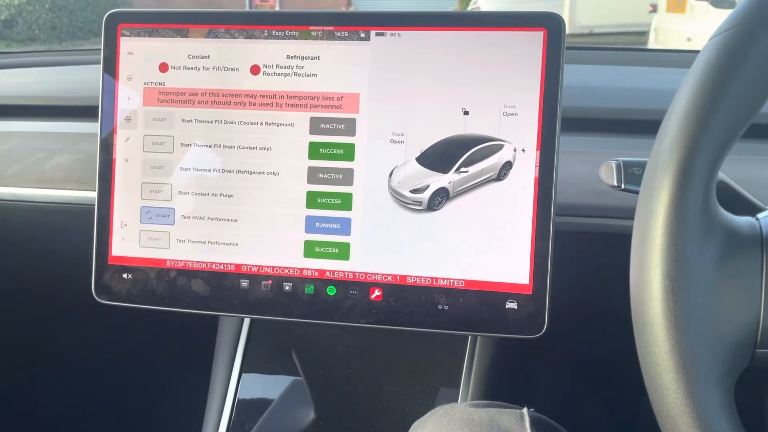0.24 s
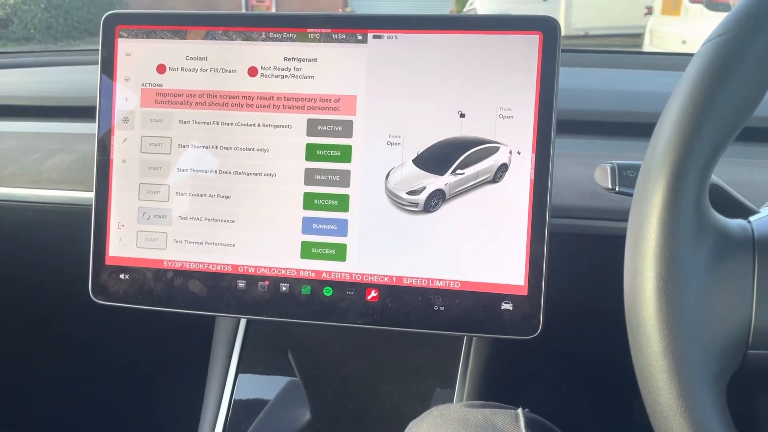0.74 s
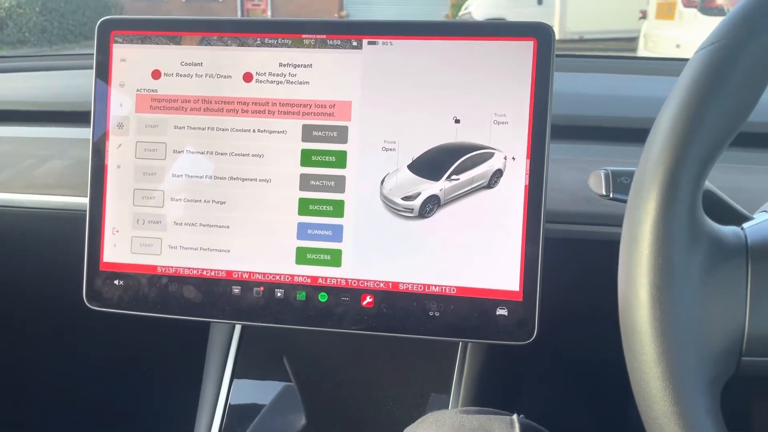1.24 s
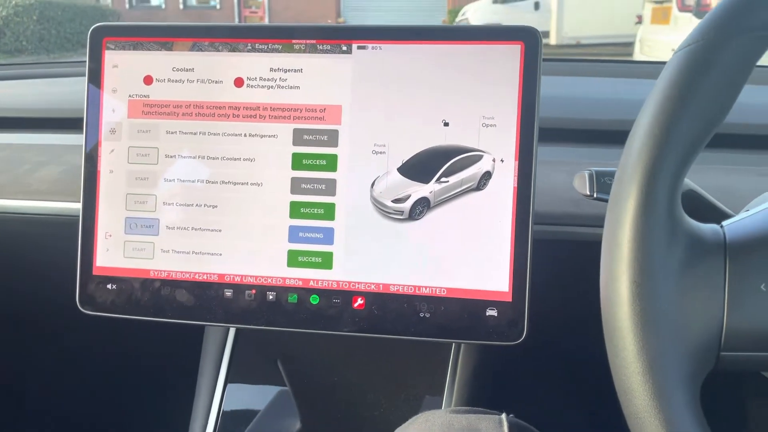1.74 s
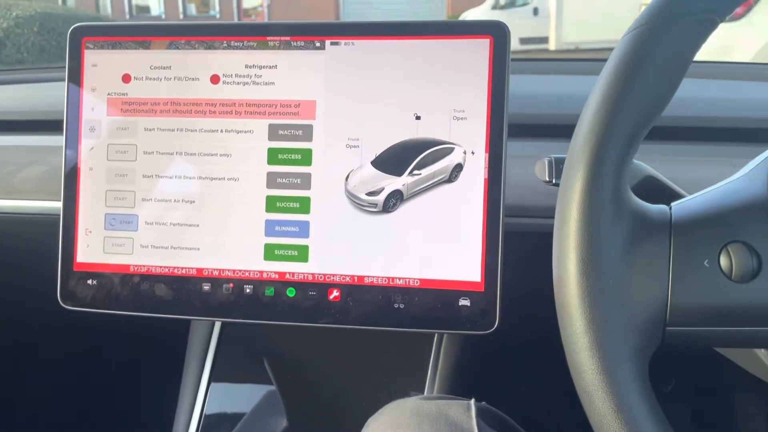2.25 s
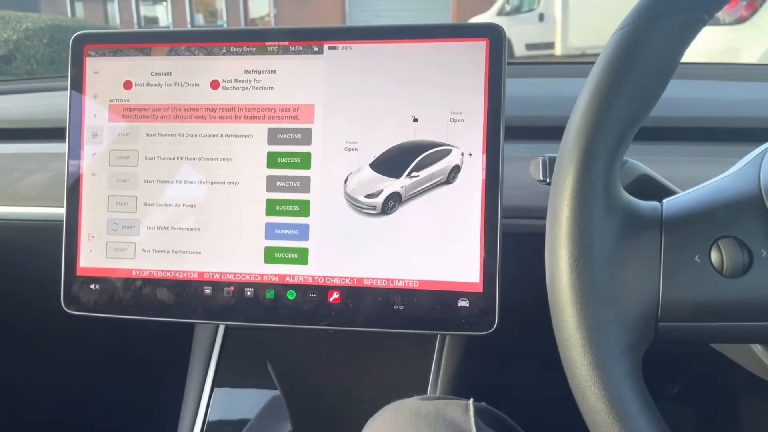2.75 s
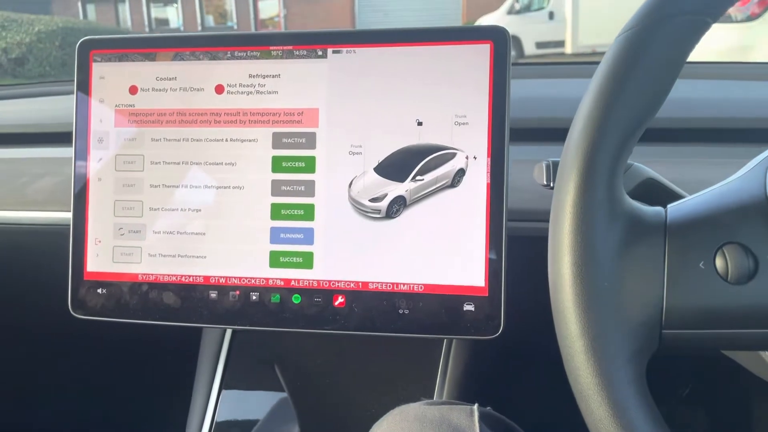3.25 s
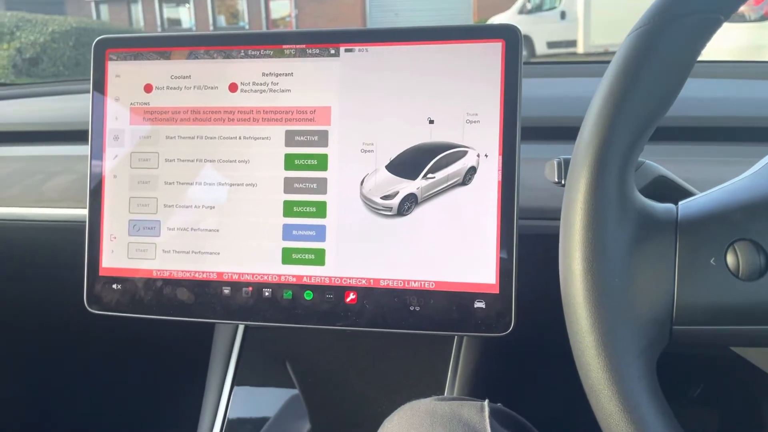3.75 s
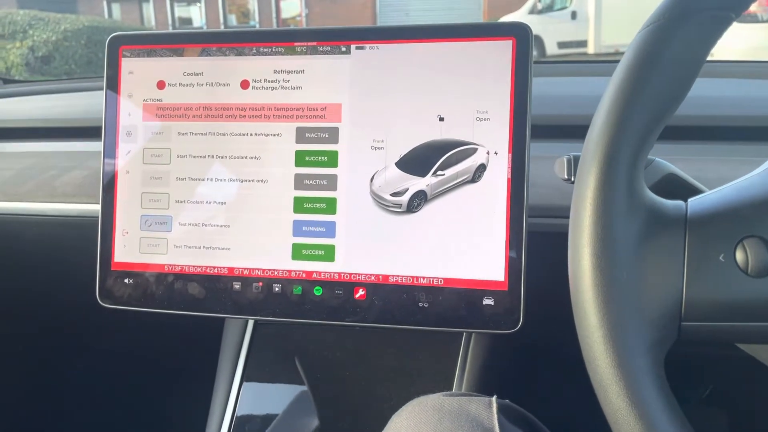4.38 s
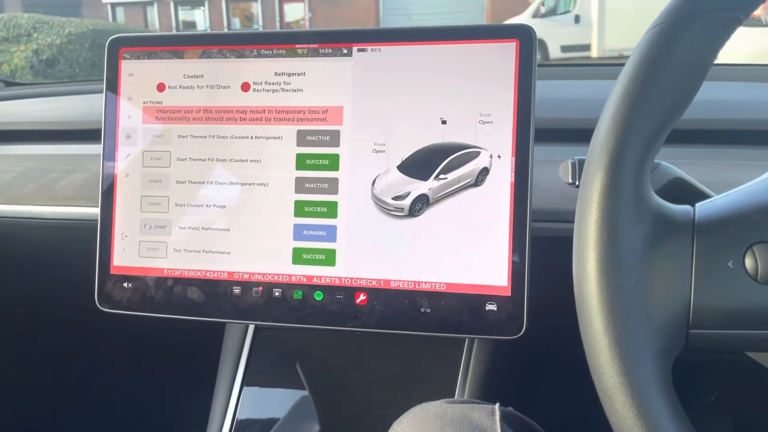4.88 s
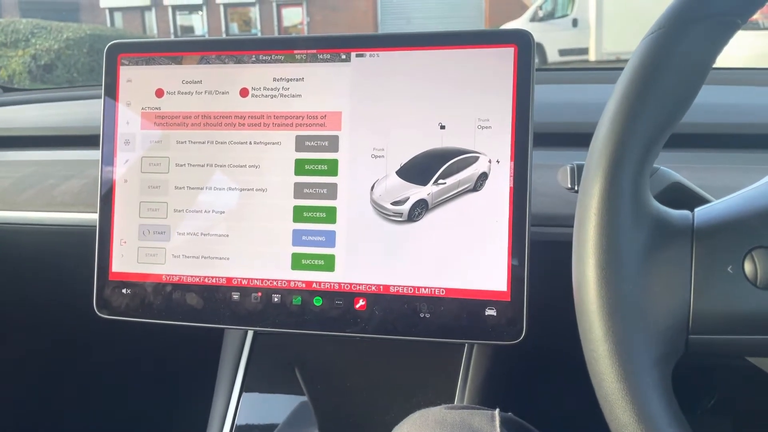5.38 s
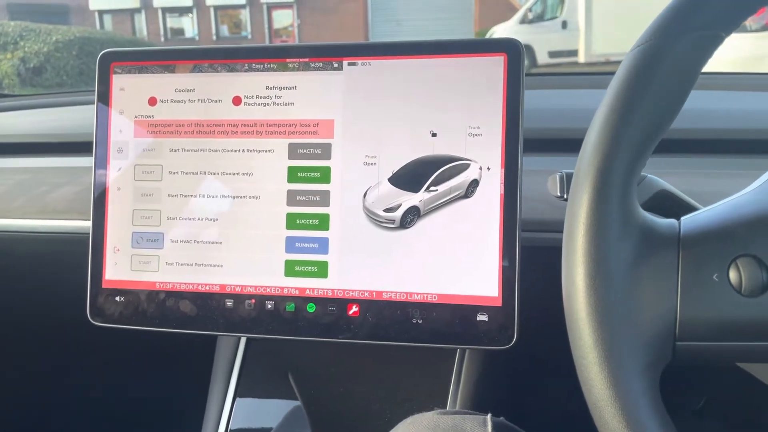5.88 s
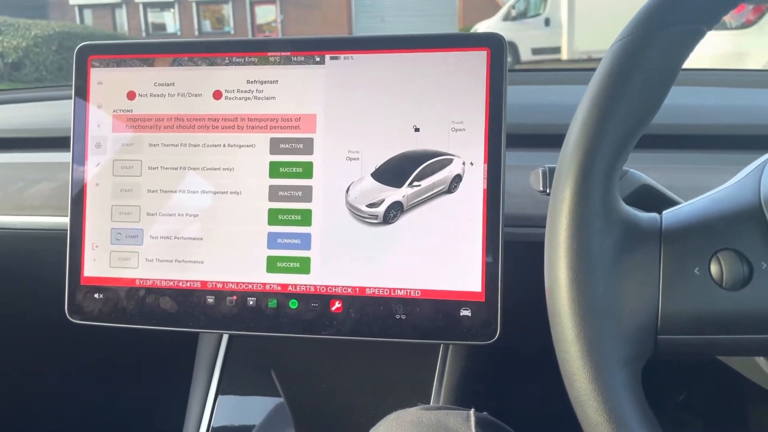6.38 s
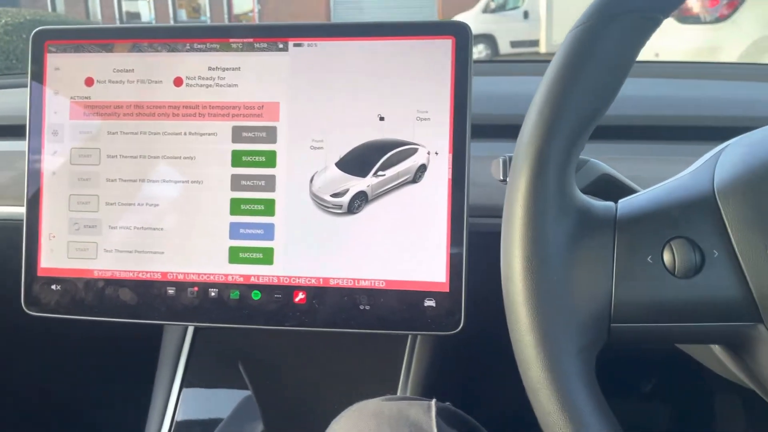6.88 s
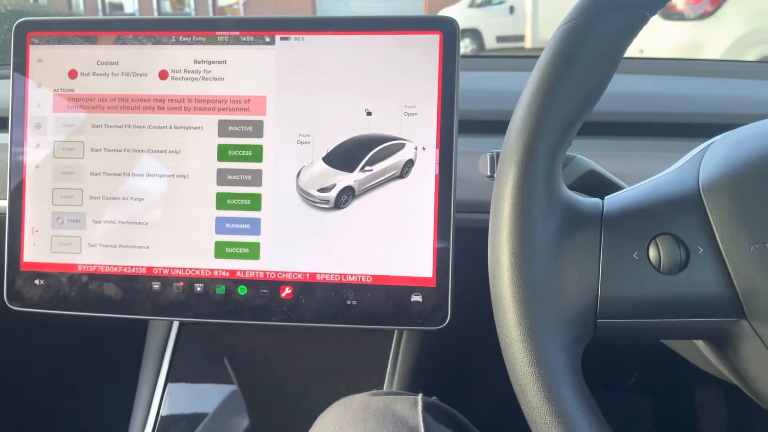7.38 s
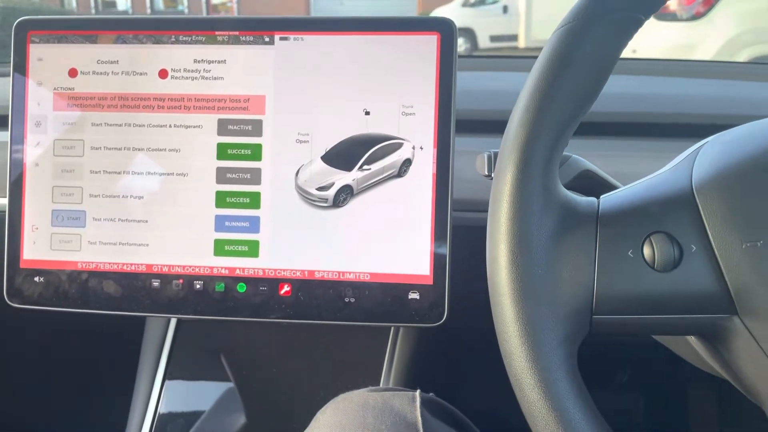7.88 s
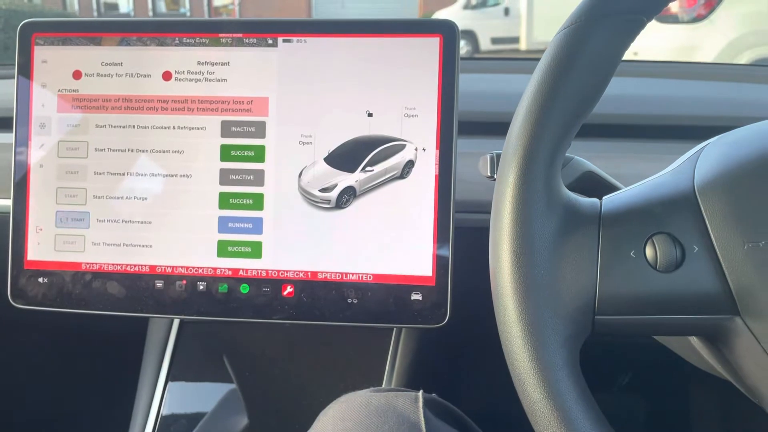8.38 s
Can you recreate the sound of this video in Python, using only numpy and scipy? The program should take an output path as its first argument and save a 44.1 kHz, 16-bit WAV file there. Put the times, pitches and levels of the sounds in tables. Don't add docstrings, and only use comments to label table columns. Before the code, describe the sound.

Inside a closed parked car, a climate blower pushes a steady, breathy hiss from the vents over thick duct rumble. A deep cabin boom surges irregularly underneath. Muffled traffic roars past for the first few seconds, drops away, then returns more faintly. Near the end a low motor hum rises and holds. A handheld phone close to the dashboard picks it up in wide, airy stereo.

```python
import sys
import numpy as np
from scipy import signal
from scipy.io import wavfile
from scipy.ndimage import uniform_filter1d

SR = 44100
rng = np.random.default_rng(int(sys.argv[2]) if len(sys.argv) > 2 else 0)


def to_wav(s):
    ch = np.atleast_2d(s).T
    pcm = np.round(np.clip(ch, -1, 1) * 32767)
    wavfile.write(sys.argv[1], SR, pcm.astype(np.int16))


def ratio(d):
    e = np.asarray(d, float) / 20
    return 10 ** e


N = 380583

FRAME, HOP = 2048, 512
HZ = np.fft.rfftfreq(FRAME, 1 / SR)
TIMES = np.arange(N // HOP + 5) * HOP / SR


def evened(x):
    return x / np.sqrt(np.mean(abs(x) ** 2) + 1e-20)


def smoothed_noise(noise, frames, bins):
    over_time = uniform_filter1d(noise, size=frames, axis=0)
    return evened(uniform_filter1d(over_time, size=bins, axis=1))


def shape(points):
    hz, db = np.transpose(points)
    return ratio(np.interp(np.log(HZ + 1), np.log(hz + 1), db, left=-90, right=-120))


def in_band(amplitude, lo_hz, hi_hz):
    return amplitude / np.linalg.norm(amplitude[(HZ > lo_hz) & (HZ < hi_hz)])


def hump(hz, width_hz):
    return 1 / (1 + (2 * (HZ - hz) / width_hz) ** 2)


def resonate(x, hz, width_hz):
    turn = np.exp(2j * np.pi * np.cumsum(hz * np.ones(len(x))) / SR)
    decay = np.exp(-np.pi * width_hz / SR)
    smooth = signal.lfilter([1 - decay], [1, -decay], x / turn + 1e-18)
    return 2 * (turn * smooth).real


def soft_step(t, at_s, edge_s):
    return .5 + .5 * np.tanh(2 * (t - at_s) / edge_s)


def traffic():
    # arrive_s, leave_s, arrive_db, leave_db
    passes = [
        (.1, 3.45, -35, -36),
        (5.55, 7.5, -36.5, -41),
        (6.9, 8.55, -39, -41),
    ]
    rest_db, edge_s = -42.5, 0.16
    power = ratio(rest_db) ** 2
    for come, go, come_db, go_db in passes:
        near = soft_step(TIMES, come, edge_s) * soft_step(-TIMES, -go, edge_s)
        level = ratio(np.interp(TIMES, [come, go], [come_db, go_db]))
        power = np.maximum(power, near * level ** 2)
    return np.sqrt(power)


def road_roar():
    # pitch_hz, width_hz, level_db
    road_humps = [(643, 103, 0), (762, 190, -5), (902, 200, -3), (1580, 540, -11.5), (2160, 510, -6.5)]
    colour = evened(sum(ratio(db) * hump(hz, width) for hz, width, db in road_humps)) / np.sqrt(len(HZ))
    above_vents = np.maximum(traffic() ** 2 - ratio(-49.0) ** 2, 0)
    return np.outer(above_vents, colour ** 2)


def motor():
    start_s, rise_s = 5.6, 1.17
    start_hz, climb_hz_per_s, top_hz = 89, 17, 135.4
    top_db, ease_db_per_s, flutter_db = -28, -3.5, 4.2
    t = np.arange(N) / SR - start_s
    waver = evened(uniform_filter1d(rng.standard_normal(N), size=6000))
    flutter = uniform_filter1d(rng.standard_normal(N), size=1700)
    flutter = evened(uniform_filter1d(flutter, size=1700))
    hz = np.clip(start_hz + climb_hz_per_s * t, 1, top_hz)
    turns = np.cumsum(hz * (1 + .012 * waver)) / SR
    level_db = top_db + ease_db_per_s * np.maximum(t - rise_s, 0) + flutter_db * flutter
    fade_in = np.clip(t / rise_s, 0, 1)
    return np.sqrt(2) * fade_in * ratio(level_db) * np.sin(2 * np.pi * turns)


def boom():
    # pitch_hz, width_hz, level_db
    mode_hz, width_hz, mode_db = (59.5, 5.3, -1.5)
    # time_s, pitch_factor
    drift = [(0, 0.93), (1.4, 1.03), (2.6, 0.92), (5.5, 1.04), (6.3, 1.07), (6.9, 0.99), (7.3, 1.04),
             (8.63, 0.99)]
    # centre_s, length_s, level_db
    gust_list = [(.45, 0.15, -24), (1.0, 0.51, -29.5), (1.426, 0.075, -22.5), (1.7, 0.27, -27.5),
                 (2.18, .15, -29), (2.5, .25, -26.5), (2.857, .12, -25.5), (3.4, 0.62, -29),
                 (4.05, 0.19, -22.5), (4.803, 0.23, -24), (5.12, .15, -27.5), (5.41, 0.19, -21.5),
                 (5.766, 0.088, -26), (6.205, 0.32, -23), (6.47, 0.069, -21), (6.853, 0.3, -26.5),
                 (7.197, 0.56, -25.5), (7.5, 0.19, -31), (7.85, 0.26, -23.5), (8.35, .12, -26),
                 (8.522, 0.15, -25.5)]
    rest_db = -38.5
    t = np.arange(N) / SR
    hz = mode_hz * np.interp(t, *np.transpose(drift))
    hum = resonate(rng.standard_normal(N), hz, width_hz)
    hum = resonate(hum, hz, 2 * width_hz)
    own_swell = np.sqrt(uniform_filter1d(hum ** 2, size=5000) / np.mean(hum ** 2) + .15)
    gusts = sum(ratio(top_db - 12.3 * ((TIMES - s) / length) ** 2) ** 2 for s, length, top_db in gust_list)
    push = np.interp(t, TIMES, np.sqrt(gusts + ratio(rest_db) ** 2))
    return ratio(mode_db) * push * evened(hum / own_swell)


def air():
    # pitch_hz, density_db (per Hz)
    rumble_points = [(12, -59), (20, -21), (36, -19), (46, -2.5), (59, -0.5), (87, -7.5), (118, 0),
                     (151, -11.5), (189, -3.5), (215, -18), (241, -6.5), (263, -7.5), (433, -17),
                     (471, -21.5), (600, -26.5), (780, -35), (1320, -120)]
    # pitch_hz, density_db (per Hz)
    hiss_points = [(300, -26), (480, -1.5), (900, -2.5), (1250, -5), (1830, -6.5), (2500, -7.5),
                   (3900, -15.5), (5200, -17.5), (5700, -21), (6500, -23), (7100, -37), (7900, -45.5),
                   (8500, -27), (11300, -31), (12300, -39), (13600, -50)]
    # pitch_hz, density_db (per Hz)
    across_points = [(25, -4), (54, -4.5), (113, 1.5), (505, -10), (930, -7), (1360, -11), (1670, -9),
                     (1850, -16.5), (3320, -19), (4950, -31.5), (6940, -23), (9400, -33), (11000, -63),
                     (13300, -44.5), (16400, -44)]
    # pitch_hz, width_hz, lift_db
    duct_modes = [(229, 8.4, -2.5), (955, 47, 2), (2075, 64, 4), (2395, 230, 2), (3060, 150, 3),
                  (3580, 200, 1.5), (4350, 250, 2), (4830, 450, 1.5)]
    # time_s,
    # level_db
    airflow = [(0, -4), (.5, -2.1), (1.4, 0), (3.2, -0.05), (5.4, -0.4), (6.1, 0.1), (6.83, 0.5),
               (6.9, -1.35), (8.63, -2.5)]
    # pitch_hz, in_step (left louder), quarter_ahead (path difference)
    lean = [(60, -0.023, 0), (200, -0.97, .15), (300, -0.69, .36), (430, 0.19, .23), (660, -0.14, .3),
            (905, 0.58, 0.25), (1340, 0.15, .05), (1900, 0.21, -.3), (2650, 0.3, .4), (4550, 0.16, 0),
            (6450, 0.23, -.5), (9000, 0, .8)]

    lift = ratio(sum(db * hump(hz, width) for hz, width, db in duct_modes))
    flow_db = np.interp(TIMES, *np.transpose(airflow))
    ducts = ratio(-28 + 0.43 * flow_db - 2 * np.exp(-TIMES / 2.9))
    vents = ratio(-42.5 + flow_db)
    rumble = np.outer(ducts, in_band(shape(rumble_points), 140, 450) * lift)
    hiss = np.outer(vents, in_band(shape(hiss_points) * lift, 2600, 6500))
    roar = road_roar()
    both = np.sqrt(np.maximum(rumble, hiss) ** 2 + roar)
    across = np.outer(vents / vents.mean(), evened(shape(across_points)) * lift) / np.sqrt(len(HZ))
    across = np.sqrt((ratio(-34.5) * across) ** 2 + ratio(-11) ** 2 * roar)

    hz, in_step, ahead = np.transpose(lean)
    share = np.interp(np.log(HZ + 1), np.log(hz), in_step + 1j * ahead)
    rest = np.sqrt(np.maximum(1 - abs(share) ** 2, 0))
    draws = rng.standard_normal((len(TIMES), len(HZ), 5))
    a, b, c, d, patches = np.moveaxis(draws, 2, 0)
    first, second = a + 1j * b, c + 1j * d
    spectra = np.array([both * first, across * (share * first + rest * second)])
    patches = smoothed_noise(patches, 8, 18)
    flicker = smoothed_noise(a * d, 3, 90)
    spectra *= ratio(0.9 * patches + 1.07 * np.clip(HZ / 8000, 0, 1.3) * flicker)
    sound = signal.istft(spectra.transpose(0, 2, 1), nperseg=FRAME, noverlap=FRAME - HOP)[1]
    return ratio(1.5) * sound[:, :N]


def scene():
    both, across = air()
    ports = np.array([both + across, both - across])
    return ports + boom() * ratio([[-.4], [.4]]) + motor() * ratio([[-1.5], [1.3]])


def band_limit(x):
    return signal.sosfilt(signal.butter(12, 15750, fs=SR, output="sos"), x)


def record(dry):
    low_cut = signal.butter(2, 38, "highpass", fs=SR, output="sos")
    mix = signal.sosfilt(low_cut, dry)
    return band_limit(mix)


dry = scene()
out = record(dry)
to_wav(out)
```